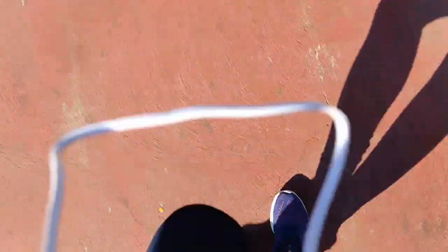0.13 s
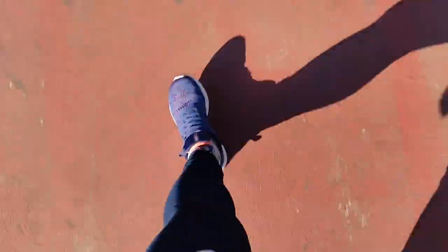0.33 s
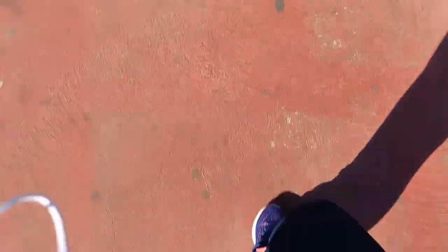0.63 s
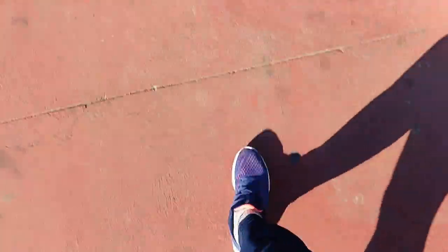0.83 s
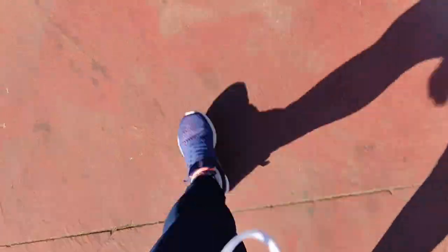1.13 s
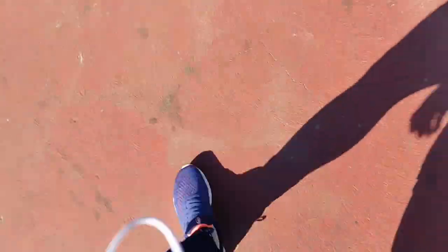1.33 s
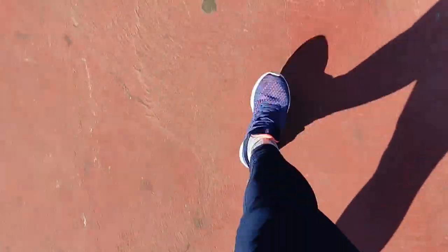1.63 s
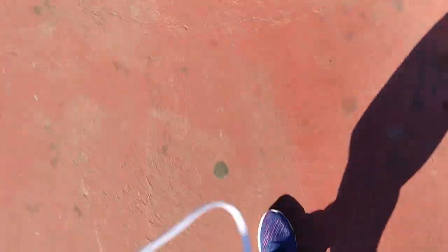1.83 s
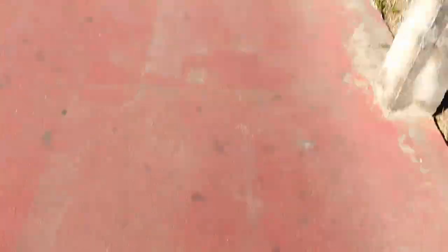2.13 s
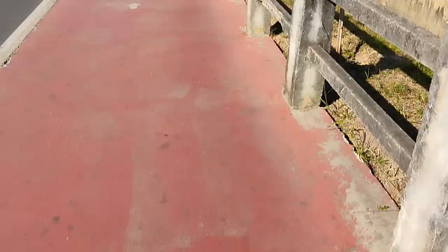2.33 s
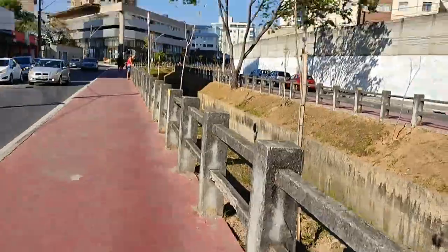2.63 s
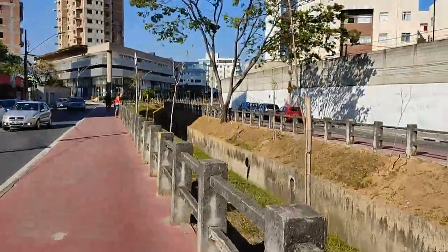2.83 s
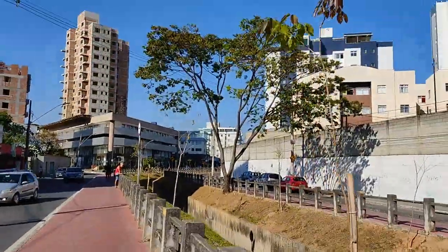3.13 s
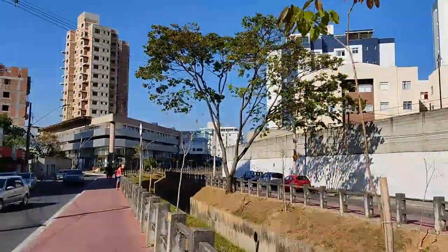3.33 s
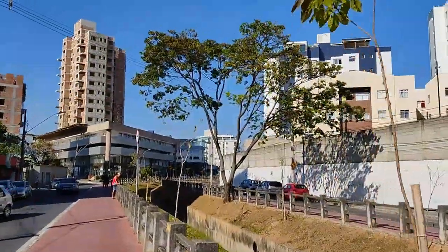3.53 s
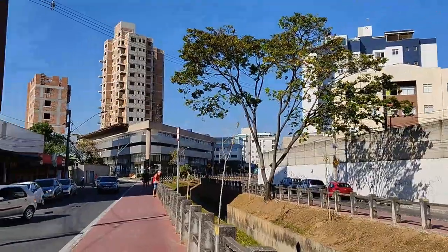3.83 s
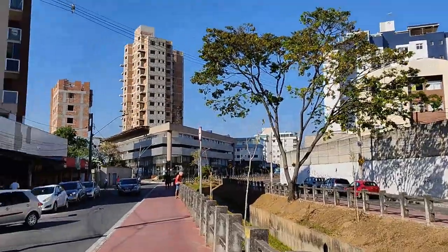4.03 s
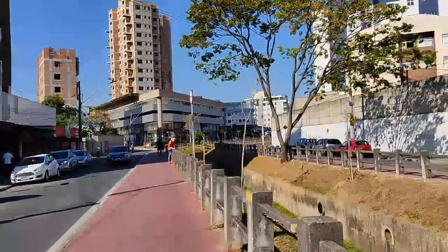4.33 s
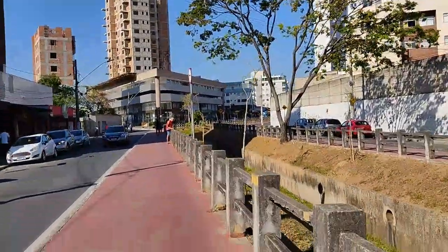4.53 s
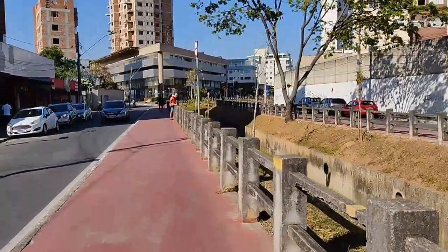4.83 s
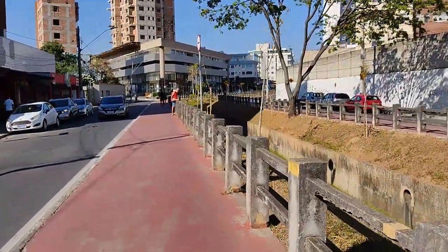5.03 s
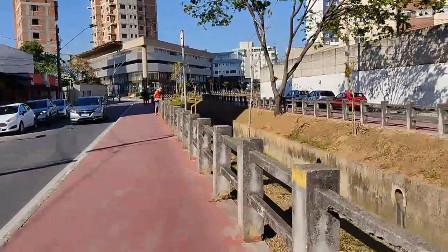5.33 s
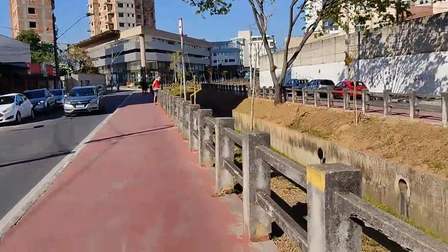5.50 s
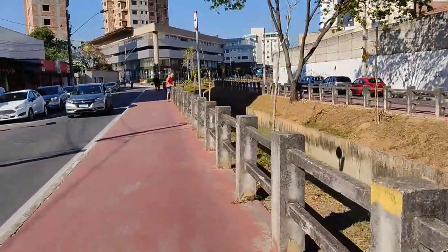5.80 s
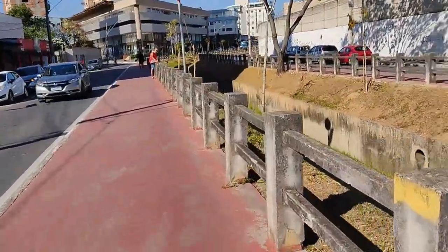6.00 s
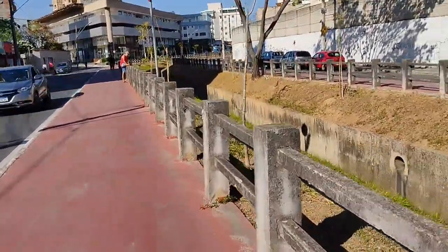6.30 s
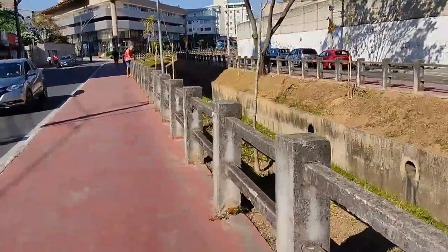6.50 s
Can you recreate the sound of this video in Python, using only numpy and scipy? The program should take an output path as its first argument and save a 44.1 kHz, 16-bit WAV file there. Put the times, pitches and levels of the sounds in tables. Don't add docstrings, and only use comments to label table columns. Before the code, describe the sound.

A phone carried in the hand along a paved path beside a road. Tyre roar and dull engine rumble run throughout, slightly hollow while the phone points down, opening and growing toward the end. Slow pressure thumps follow the strides. From 0.2 to 0.9 s a bird twitters in quick falling notes amid rustling cloth and dry snaps. Wind eddies pop at 0.8-1.1, with gravel crunches, small cable knocks and faint squeaks until 1.3. At 2.27 a stone clacks brightly, and metal scrap skips with thin rings until about 2.8. Wind flutters again from 2.9 to 3.9, with gritty crunching near 3.6. A loose stone taps at 4.5; engines drone around 4.1-5.0 and lower from 5.65. Scuffs and cloth snaps strengthen near 5.8. A distant, rough, beating horn sounds at 6.25, again shorter at 6.47, then as a faint stub at 6.6.

```python
import sys
import numpy as np
from scipy import signal
from scipy.io import wavfile

SR = 44100
rng = np.random.default_rng(int(sys.argv[2]) if len(sys.argv) > 2 else 0)


def transcribe(signal):
    frames = np.atleast_2d(signal).T
    limited = np.clip(frames, -1, 1)
    pcm = np.round(limited * 32767).astype(np.int16)
    wavfile.write(sys.argv[1], SR, pcm)


def gain_from_db(level_db):
    decades = np.asarray(level_db, float) / 20
    return 10 ** decades


N = 293706

STRIDE_SWAY = [(0, .2), (0.245, -.11), (0.362, 0.048), (0.545, -0.15), (0.765, 0.12), (0.88, -0.087)]
# (start [s], strength [ratio])
STRIDES = [
    (-.27, 3.6),
    (0.616, 1.08),
    (1.509, 1.16),
    (2.403, 0.85),
    (3.29, 1.05),
    (4.185, 1.07),
    (5.087, 1.09),
    (5.968, 1.01),
    (6.86, 0.99),
]
# (time [s], pressure [full scale], width [s])
HAND_JERKS = [
    (0., -0.24, 0.083),
    (1.634, 0.33, 0.035),
    (1.751, -0.2, 0.087),
    (5.78, 0.125, 0.023),
    (6.67, 0.13, 0.021),
]
# (time [s], level [dB])
GUSTS = [(0.0, -39), (0.09, -42), (0.74, -56), (0.8, -44), (0.97, -49), (1.09, -43), (1.25, -53.5),
         (2.74, -52), (3.08, -43), (3.28, -56), (3.7, -42), (3.97, -49), (4.38, -57), (4.5, -44),
         (4.6, -48), (6.05, -48), (6.2, -44), (6.6, -46)]
# (time [s], pressure [full scale], width [ms])
EDDIES = [(0.817, -0.13, 5.9), (0.8289, -0.14, 4.4), (0.842, -0.053, 3.1), (0.8581, 0.1, 3.8),
          (0.869, -0.038, 3.3), (0.877, 0.04, 2.5), (0.911, -0.12, 3.6), (0.917, 0.07, 4),
          (1.075, -0.04, 4), (1.103, 0.035, 5.2), (1.138, 0.045, 3.9), (1.3879, -0.031, 4.7),
          (2.92, -0.062, 3.9), (3.0181, -0.026, 1.6), (3.0486, -0.044, 4.7), (3.059, 0.054, 4.1),
          (3.094, 0.04, 5), (3.105, -0.042, 4.2), (3.203, 0.055, 7.8), (3.409, 0.068, 1.3),
          (3.4468, 0.03, 2.3), (3.466, 0.0079, 1.9), (3.486, 0.033, 1.6), (3.562, 0.047, 1.65),
          (3.633, 0.093, 1.8), (3.507, 0.02, 1.5), (3.527, 0.018, 1.5), (3.612, 0.025, 1.6),
          (3.655, 0.03, 2.2), (3.737, 0.02, 1.5), (3.9, 0.015, 1.4), (3.764, 0.038, 1.9),
          (3.802, 0.018, 1.8), (3.7114, 0.05, 2.7), (3.8413, 0.031, 1.1), (3.877, 0.038, 1.34),
          (4.7757, -0.048, 3.2), (5.6074, -0.019, 1.3), (5.997, -0.02, 4.8), (6.1316, -0.024, 3.3),
          (6.181, 0.018, 3.4)]
# (time [s], tyre level [dB], phone tilt to the ground [0-1])
TRAFFIC = [(0.0, -53.5, 0.12), (0.91, -54, 0.62), (1.17, -51, 0.54), (1.97, -54, 0.5), (2.26, -52.5, 0.48),
           (2.97, -54, 0), (3.84, -52, 0.2), (4.3, -54, 0.14), (5.77, -50, 0.33), (6.66, -47.5, 0)]
# (frequency [Hz], density [dB per Hz])
RUMBLE_SPECTRUM = [(88, -52), (150, -6.5), (210, -2), (1300, -11), (1400, 6), (1820, -55), (3080, -120)]
# (frequency [Hz], density [dB per Hz])
TYRE_SPECTRUM = [(650, -52), (1100, -6.5), (1680, 4.5), (2110, -0.5), (2390, -2.5), (3350, -10),
                 (4470, -18), (5220, -13), (7000, -37), (9100, -70), (15400, -120)]
# (frequency [Hz], density [dB per Hz])
HISS_SPECTRUM = [(3530, -29), (6000, -14.5), (7730, -14), (9340, -14), (10400, -13.5), (15100, -5.5),
                 (15700, -7.5)]
# (time [s], length [s], start pitch [Hz], end pitch [Hz], level [dB])
ENGINE_PASSES = [
    (0, 1.2, 58.7, 55.2, -54),
    (1.299, 0.5, 78.7, 85, -52),
    (2.049, 0.87, 86.1, 85.3, -50),
    (4.102, 0.86, 72.04, 71.7, -43.5),
    (5.646, 1.8, 53.06, 53.3, -41.5),
]
# (frequency [Hz], width [Hz], level [dB])
CLOTH_MODES = [(10990, 1000, -11), (12500, 550, -4), (15250, 2800, -5), (15770, 1150, -2.5)]
# (frequency [Hz], width [Hz], level [dB])
SOLE_MODES = [(2400, 242, 12), (3340, 850, 0), (5296, 200, -2), (7500, 670, -11.5), (8230, 165, -3),
              (9310, 610, -6.5)]
# (time [s], hold [s], cloth level [dB], sole level [dB])
SCUFFS = [(0.045, 0.022, -54, -56.5), (0.67, 0.0022, -57, -59.5), (0.918, 0.015, -57, -62.5),
          (0.949, .01, -52.5, -54.5), (1.201, .002, -70, -59), (1.328, 0.0018, -53, -57),
          (1.439, .002, -55, -61), (1.571, .002, -57, -62), (1.831, .002, -52.5, -56),
          (2.213, .006, -54.5, -63), (2.277, .004, -61, -62), (2.297, 0.045, -59, -60),
          (2.441, .002, -57, -61.5), (2.699, 0.013, -52.5, -59), (3.062, 0.026, -57.5, -61.5),
          (3.155, 0.07, -55.5, -59), (3.977, 0.016, -53.5, -64), (4.064, .002, -53, -63),
          (4.078, 0.044, -53.5, -56), (4.207, .002, -56, -61.5), (4.49, .003, -49.5, -53),
          (4.867, .006, -55, -63.5), (4.989, 0.033, -55.5, -62.5), (5.112, .002, -57, -60),
          (5.385, 0.015, -54.5, -57), (5.76, .01, -46.5, -55), (5.844, 0.051, -52, -58),
          (5.994, .002, -56, -63), (6.27, 0.019, -55, -57), (6.63, 0.022, -48, -57)]
# (time [s], hold [s], cloth level [dB])
RUSTLES = [(0.345, .002, -62), (0.388, .01, -55.5), (0.425, .04, -63), (0.483, 0.079, -58),
           (1.261, 0.0088, -54), (1.4, 0.024, -56), (2.5, .09, -64.5), (3.049, .002, -56),
           (3.133, .02, -56), (3.298, .008, -61), (3.617, .008, -60.5), (4.045, .01, -57),
           (4.46, .016, -57), (4.785, .002, -60), (4.851, .005, -60), (4.881, .002, -49.5),
           (4.958, 0.0072, -53), (5.364, .01, -57.5), (5.733, .01, -67), (5.774, .008, -48.5),
           (5.833, .005, -50.5), (5.962, .002, -60)]
# (time [s], bright peak [dB], dull peak [dB])
SNAPS = [(0.0046, -47, -58), (0.0541, -41, -44), (0.3435, -40, -56), (0.3838, -38, -55), (0.3915, -37, -54),
         (0.3951, -42, -60), (0.4018, -42, -58), (0.4696, -41, -57), (0.4789, -37, -48), (0.835, -44, -64),
         (0.8627, -47, -66), (0.9498, -39, -45), (0.9844, -47, -59), (0.9986, -47, -61), (1.03, -48, -48),
         (1.1201, -49, -68), (1.2488, -42, -56), (1.2632, -44, -60), (1.2688, -41, -52), (1.3089, -42, -58),
         (1.3299, -38, -49), (1.5329, -42, -59), (1.6615, -45, -61), (2.1838, -44, -67), (2.2104, -42, -53),
         (2.2612, -48, -67), (2.5163, -46, -64), (2.543, -45, -62), (2.549, -43, -65), (2.5774, -36, -48),
         (2.6976, -39, -50), (2.702, -39, -49), (2.8365, -48, -61), (3.0014, -49, -62), (3.0058, -47, -60),
         (3.0191, -45, -61), (3.129, -41, -62), (3.1455, -39, -52), (3.3683, -44, -56), (3.397, -44, -61),
         (3.4075, -42, -61), (3.4112, -34.5, -41), (3.4484, -48, -70), (3.4796, -39, -60),
         (3.9499, -47, -57), (4.4866, -36, -47), (4.9749, -39, -53), (4.9807, -32, -44), (5.2921, -48, -55),
         (5.7201, -36, -48), (5.7524, -41, -57), (5.7857, -38, -57), (5.8209, -43, -54), (5.8354, -33, -47),
         (5.8397, -39, -49), (5.8971, -38, -51), (5.9589, -41, -57), (5.9661, -46, -63), (6.1188, -46, -59),
         (6.5628, -47, -64)]
# (time [s], peak [dB])
SEAM_TICKS = [(3.562, -44), (3.6, -43), (5.2555, -42), (5.757, -41), (6.042, -48), (6.624, -40),
              (4.378, -47), (5.268, -47), (3.349, -46)]
# (time [s], peak [dB])
CABLE_KNOCKS = [(0.9807, -44), (1.0014, -44), (1.029, -42), (1.0465, -42), (1.0979, -42), (1.8624, -42),
                (1.8816, -40), (1.9044, -40), (1.9719, -60), (5.6002, -49), (5.6486, -45.5)]
# (time [s], length [s], low edge [Hz], high edge [Hz], level [dB])
CRUNCHES = [(0.995, 0.49, 1560, 2580, -60), (2.277, 0.11, 1900, 3470, -54), (0.944, 0.02, 2200, 3350, -49),
            (1.24, 0.1, 1500, 2500, -57), (2.696, 0.033, 2250, 3800, -54), (4.102, .045, 2100, 2780, -54),
            (5.387, .05, 2110, 2900, -55), (4.507, 0.043, 2100, 2900, -55), (5.656, .006, 4500, 6000, -55),
            (1.04, 0.12, 1700, 2400, -60), (1.155, 0.092, 1460, 2400, -48.5),
            (2.095, 0.04, 915, 4600, -49.5), (2.264, 0.0078, 2000, 5500, -54),
            (3.577, 0.11, 2080, 3320, -53), (3.686, 0.022, 1400, 2300, -46),
            (3.709, 0.042, 1190, 3330, -48)]
# (time [s], length [s], low edge [Hz], high edge [Hz], level [dB])
THUDS = [
    (2.17, .16, 149, 230, -49.5),
    (0.82, .07, 200, 410, -51),
    (3.03, 0.073, 400, 590, -54.5),
]
# (time [s], length [s], start pitch [Hz], level [dB])
BIRD_NOTES = [(0.2, 0.018, 3940, -58.5), (0.257, 0.022, 3146, -50), (0.29, 0.042, 3340, -50),
              (0.362, 0.013, 3560, -58), (0.41, .022, 3330, -54), (0.45, 0.031, 3290, -55),
              (0.494, 0.02, 3700, -55), (0.53, 0.03, 3440, -58), (0.579, 0.022, 3480, -59),
              (0.623, 0.016, 3630, -54), (0.67, 0.015, 3400, -55), (0.716, 0.035, 3420, -55),
              (0.759, 0.013, 3560, -54), (0.788, .015, 3060, -58), (0.82, 0.028, 3040, -52),
              (0.88, 0.023, 3040, -56)]
# (time [s], length [s], start pitch [Hz], level [dB])
SQUEAKS = [
    (1.16, .06, 2050, -58),
    (1.2, 0.103, 2370, -60),
    (1, 0.048, 1830, -55.5),
    (1.05, .04, 1850, -54),
    (1.02, 0.12, 2350, -57),
    (1.215, 0.065, 1500, -58),
    (5.26, 0.084, 870, -53.5),
    (5.33, 0.075, 829, -56),
]
# (time [s], length [s],
# start pitch [Hz], end pitch [Hz], level [dB])
SWEEPS = [(.328, .016, 3100, 4800, -60), (.208, .02, 2750, 3050, -55), (.258, .012, 2900, 3200, -55),
          (.678, .012, 3800, 2900, -55), (.351, .014, 4900, 3400, -58), (.398, .012, 5100, 3800, -56),
          (.535, .012, 3300, 4200, -61), (.508, .03, 3450, 3300, -58), (.66, .012, 4600, 3700, -62),
          (.466, .01, 3900, 4700, -62), (.485, .016, 4700, 3500, -63), (1.012, .028, 1390, 1410, -57),
          (1.058, .066, 1405, 1375, -50.5), (.42, .012, 3450, 3250, -58), (.57, .03, 3550, 3000, -60),
          (.675, .016, 3600, 3200, -56), (.6, .02, 4000, 4700, -63), (.748, .015, 5100, 3500, -57)]
# (time [s], peak [dB], pitch [Hz], t60 [s])
TAPS = [(2.268, -49, 5010, .05), (2.268, -39, 3400, 0.029), (2.269, -34, 2190, 0.034),
        (2.269, -33, 2440, 0.045), (2.268, -46, 5600, .02), (2.27, -27.5, 2687, 0.073),
        (2.697, -38, 2400, 0.06), (2.697, -48, 5500, 0.03), (0.945, -38, 2480, .05),
        (0.945, -41, 2850, .04), (2.578, -48, 2950, .05), (2.315, -42, 2350, .04),
        (5.105, -52, 2300, 0.042), (4.5, -29, 2480, 0.029)]
# (time [s], peak [dB], pitch [Hz], t60 [s])
SCRAP_RINGS = [
    (2.272, -49, 2700, .4),
    (2.349, -41.5, 2698, .2),
    (2.395, -47, 2703, .25),
    (2.463, -47.5, 2700, .3),
    (2.51, -50, 2698, .25),
]
# (time [s], length [s], pitch [Hz], level [dB])
HORN_BLASTS = [
    (6.248, 0.212, 545, -39),
    (6.472, 0.12, 541, -43),
    (6.61, .04, 545, -46),
]

BUFFET_DB, BUFFET_FOLLOWS, MEAN_GUST_DB = -48, 0.16, -48
ENGINES_DB, ENGINES_FOLLOW, MEAN_ROAD_DB = -51, 0.86, -52
RUB_RISE_DB_PER_S, RUB_FALL_DB_PER_S, RUSTLE_DULL_DB = 1050, 1000, -11.5
NOTE_FALL_HZ_PER_S, SQUEAK_END_RATIO = 19800, 0.94
HORN_ATTACK_S, HORN_RELEASE_S, HORN_START_SAG = 0.017, 0.0096, 0.041
HORN_BEAT_HZ, HORN_RISE_HZ_PER_S, HORN_FADE_DB_PER_S, REED_LEAD_RAD = 19.2, 75, 21, 3.57


def rms_one(x):
    return x / np.sqrt(np.mean(x ** 2) + 1e-20)


def in_time(rows):
    s, *columns = np.transpose(rows)
    return [np.interp(np.arange(N) / SR, s, c) for c in columns]


def drift(rate_hz):
    r = np.exp(-2 * np.pi * rate_hz * 40 / SR)
    slow = signal.lfilter([1], [1, -2 * r, r * r], rng.standard_normal(N // 40 + 2002))[2000:]
    return np.interp(np.arange(N) / 40, np.arange(len(slow)), rms_one(slow))


def band(x, low_hz, high_hz):
    return signal.sosfilt(signal.butter(2, [low_hz, high_hz], "band", fs=SR, output="sos"), x)


def resonances(x, modes):
    out = 0
    for k, (hz, width_hz, db) in enumerate(modes):
        r = np.exp(-np.pi * width_hz / SR)
        poles = [1, -2 * r * np.cos(2 * np.pi * hz / SR), r * r]
        out = out + (-1) ** k * gain_from_db(db) * signal.lfilter([1 - r * r, 0, r * r - 1], poles, x)
    return rms_one(out)


def coloured(spectrum, patchy_db, rate_hz):
    hz, db = np.transpose(spectrum)
    octaves = np.arange(0, np.log2(hz[-1] / hz[0]) + .5, 1 / 3)
    edges = hz[0] * 2 ** octaves.clip(0, np.log2(19000 / hz[0]))
    out, together, white = 0, drift(rate_hz), rng.standard_normal((2, N))
    for k, (low_hz, high_hz) in enumerate(zip(edges, edges[1:])):
        level_db = np.interp(np.log(low_hz * high_hz) / 2, np.log(hz), db)
        flicker_db = patchy_db * (0.56 * together + drift(2 * rate_hz))
        out = out + gain_from_db(level_db + flicker_db) * band(white[k % 2], low_hz, high_hz)
    return rms_one(out)


def add(out, s, sound):
    i = max(round(s * SR), 0)
    out[i:i + len(sound)] += sound[:N - i]


def sway():
    t = np.arange(N) / SR
    turn_s, turn_pressure = [], []
    for (s, size), (s_next, size_next) in zip(STRIDES, STRIDES[1:]):
        for part, p in STRIDE_SWAY:
            turn_s.append(s + part * (s_next - s))
            turn_pressure.append(p * (size if part < .5 else size_next))
    index = np.arange(len(turn_s))
    place = np.interp(t, turn_s, index)
    eased = np.floor(place) + .5 - .5 * np.cos(np.pi * (place % 1))
    out = np.interp(eased, index, turn_pressure)
    for s, p, width_s in HAND_JERKS:
        out += p * np.exp(-.5 * ((t - s) / width_s) ** 2)
    return out + gain_from_db(-32.5) * rms_one(band(drift(6.6), 3.63, 44.0))


def wind():
    deep_db, = in_time(GUSTS)
    deep = rms_one(band(rng.standard_normal(N), 35, 64.8))
    out = gain_from_db(deep_db + 2.2 * drift(1.3)) * deep
    buffet_db = np.minimum(BUFFET_DB + BUFFET_FOLLOWS * (deep_db - MEAN_GUST_DB), -44)
    buffet = rms_one(band(band(rng.standard_normal(N), 47.0, 123.6), 63.4, 220))
    out += gain_from_db(buffet_db + 1.8 * drift(20.)) * buffet
    for s, p, ms in EDDIES:
        u = np.arange(-.02 * SR, .02 * SR) / SR * 1000 / ms
        roundness = min(2, 0.83 + .22 * ms)
        kick = np.exp(-np.where(u < 0, 4.4 * u * u, 0.82 * np.abs(u) ** roundness))
        rebound = 0.42 * np.exp(-.16 * (u - .7) ** 2)
        add(out, s - .02, p * (kick - rebound))
    return out


def road():
    tyre_db, tilt = in_time(TRAFFIC)
    engine_db = ENGINES_DB + ENGINES_FOLLOW * (tyre_db - MEAN_ROAD_DB)
    street = gain_from_db(engine_db) * coloured(RUMBLE_SPECTRUM, patchy_db=1.5, rate_hz=8.0)
    street += gain_from_db(tyre_db - 0.87) * coloured(TYRE_SPECTRUM, patchy_db=1.54, rate_hz=18.0)
    street -= np.clip(tilt, 0, 1) * signal.lfilter(*signal.iirpeak(1290, 3.5, fs=SR), street)
    return street + gain_from_db(-68.5) * coloured(HISS_SPECTRUM, patchy_db=2.6, rate_hz=9.)


def engines():
    out = np.zeros(N)
    unsteady = np.resize(gain_from_db(2.8 * drift(9.3)) * np.exp(.6j * drift(4.7)), N + SR)
    for s, length_s, from_hz, to_hz, db in ENGINE_PASSES:
        u = np.linspace(0, 1, round(length_s * SR))
        phase = 2 * np.pi * np.cumsum(from_hz + (to_hz - from_hz) * u) / SR
        tone = np.exp(1j * phase) * unsteady[round(s * SR):][:len(u)]
        add(out, s, gain_from_db(db + 2) * np.abs(np.sin(np.pi * u)) ** 0.59 * tone.real)
    return out


def grit(per_s, spread_db, smooth):
    sizes = gain_from_db(spread_db * np.minimum(rng.exponential(1, N), 4)) * rng.choice([-1, 1], N)
    clicks = sizes * (rng.random(N) < per_s / SR)
    return rms_one(clicks) + smooth * rng.standard_normal(N)


def swell(s, hold_s):
    first = max(round((s - .06) * SR), 0)
    last = min(round((s + hold_s + .06) * SR), N)
    t = np.arange(first, last) / SR - s
    slope_db = np.minimum(RUB_RISE_DB_PER_S * t, RUB_FALL_DB_PER_S * (hold_s + 0.0033 - t))
    return slice(first, last), gain_from_db(np.minimum(0, slope_db))


def snap(noise, peak_db, low_hz, high_hz):
    crack = band(noise * np.exp(-np.arange(len(noise)) / SR / 0.00049), low_hz, high_hz)
    return gain_from_db(peak_db) * crack / np.abs(crack).max()


def rubs():
    cloth = gain_from_db(-76 + 3.0 * drift(12.))
    sole = gain_from_db(-74 + 2.7 * drift(7.7))
    rustles = [(s, hold_s, db, db + RUSTLE_DULL_DB) for s, hold_s, db in RUSTLES]
    for s, hold_s, cloth_db, sole_db in SCUFFS + rustles:
        span, shape = swell(s, hold_s)
        cloth[span] = np.maximum(cloth[span], gain_from_db(cloth_db) * shape)
        sole[span] = np.maximum(sole[span], gain_from_db(sole_db) * shape)
    cloth_grit = grit(1500., spread_db=4.0, smooth=1.4)
    sole_grit = grit(2500., spread_db=3.0, smooth=.8)
    out = cloth * gain_from_db(2.0 * drift(80.)) * resonances(cloth_grit, CLOTH_MODES)
    return out + sole * gain_from_db(10.5 + 1.7 * drift(75.0)) * resonances(sole_grit, SOLE_MODES)


def snaps():
    out = np.zeros(N)
    for s, bright_db, dull_db in SNAPS:
        noise = rng.standard_normal(300)
        add(out, s - .0003, snap(noise, bright_db, 11000, 15100) + snap(noise, dull_db - 1.2, 8000, 11500))
    for s, db in SEAM_TICKS:
        add(out, s, snap(rng.standard_normal(300), db, 9500, 15000))
    for s, db in CABLE_KNOCKS:
        add(out, s, snap(rng.standard_normal(300), db - 5, 3500, 15000))
    stray = rng.random(N) < 22. * gain_from_db(5.5 * drift(2.5)) / SR
    fibres = stray * rng.standard_normal(N) + 1e-18
    return out + gain_from_db(-43) * band(band(fibres, 11500, 17000), 11000, 17000)


def bird():
    out = np.zeros(N)
    glides = [(s, length_s, hz, hz - NOTE_FALL_HZ_PER_S * length_s, db) for s, length_s, hz, db in BIRD_NOTES]
    glides += [(s, length_s, hz, hz * SQUEAK_END_RATIO, db) for s, length_s, hz, db in SQUEAKS]
    for s, length_s, from_hz, to_hz, db in glides + SWEEPS:
        u = np.linspace(0, 1, round(length_s * SR))
        phase = 2 * np.pi * np.cumsum(from_hz * (to_hz / from_hz) ** u) / SR
        add(out, s, gain_from_db(db + 0.5) * np.abs(np.sin(np.pi * u)) ** 0.73 * np.sin(phase))
    echo_s = np.arange(SR // 4) / SR
    echoes = rng.standard_normal(SR // 4) * gain_from_db(-60 * echo_s / 0.23)
    return out + gain_from_db(-31.5) * signal.fftconvolve(out, echoes)[:N]


def footfalls():
    out, gravel = np.zeros(N), grit(3000., spread_db=1.0, smooth=1.0)
    for s, length_s, low_hz, high_hz, db in CRUNCHES + THUDS:
        u = np.linspace(0, 1, round(length_s * SR))
        piece = gravel[round(s * SR):][:len(u)]
        piece = rms_one(band(band(piece, low_hz, high_hz), low_hz, high_hz))
        add(out, s, gain_from_db(db) * piece * np.minimum(12 * u, 1) * np.sqrt(1 - u * u))
    return out


def taps():
    out, t = np.zeros(N), np.arange(SR // 2) / SR
    for s, db, hz, t60_s in TAPS + SCRAP_RINGS:
        partner = 0.65 * np.exp(-t / 0.01) * np.sin(2 * np.pi * hz * 1.04 * t)
        pair = np.sin(2 * np.pi * hz * t) + partner
        add(out, s, gain_from_db(db - 60 * t / t60_s) * np.minimum(t / 0.0024, 1) * pair)
    return out


def horn():
    out, wobbles = np.zeros(N), [.6 * drift(18.) for k in range(3)]
    for s, length_s, hz, db in HORN_BLASTS:
        t = np.arange(round(length_s * SR)) / SR
        pitch_hz = hz * (1 - HORN_START_SAG * np.exp(-t / HORN_ATTACK_S)) + HORN_RISE_HZ_PER_S * t
        third = gain_from_db(-7.5) * 2.5 * (t / .09) ** 2 * np.exp(-t * t / .008)
        tone = 0
        for k, weight, wobble in zip([-1, 0, 1], [.65, 1., .2], wobbles):
            phase = 2 * np.pi * np.cumsum(pitch_hz + k * HORN_BEAT_HZ) / SR + k * REED_LEAD_RAD
            phase = phase + np.resize(wobble[round(s * SR):], len(t))
            reed = np.sin(phase) + gain_from_db(-24) * np.sin(2 * phase) + third * np.sin(3 * phase)
            tone = tone + weight * reed
        ramps = np.minimum(t / HORN_ATTACK_S, (length_s - t) / HORN_RELEASE_S)
        add(out, s, gain_from_db(db - HORN_FADE_DB_PER_S * t) * np.minimum(1, ramps) * tone)
    return out


def scene():
    air = sway() + wind() + road() + engines()
    walker = rubs() + snaps() + footfalls() + taps()
    return (air + walker + bird() + horn())[None]


def band_limit(x):
    return signal.sosfilt(signal.butter(12, 16870, fs=SR, output="sos"), x)


def record(dry):
    cut = signal.sosfilt(signal.ellip(10, .5, 60, 15740, fs=SR, output="sos"), dry)
    return band_limit(cut)


dry = scene()
out = record(dry)
transcribe(out)
```